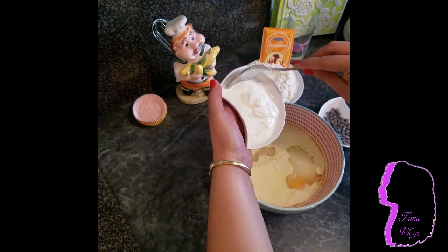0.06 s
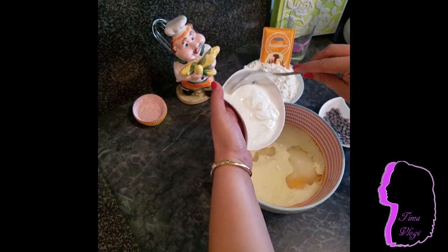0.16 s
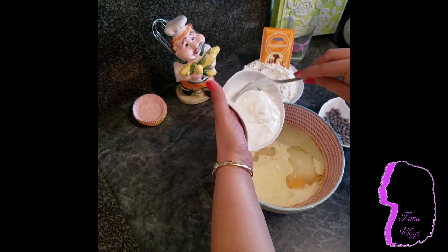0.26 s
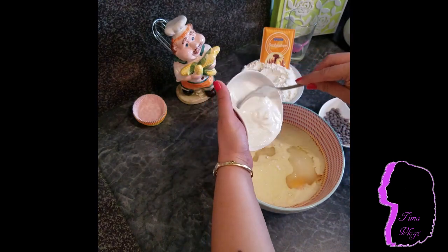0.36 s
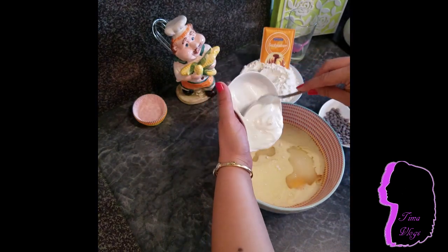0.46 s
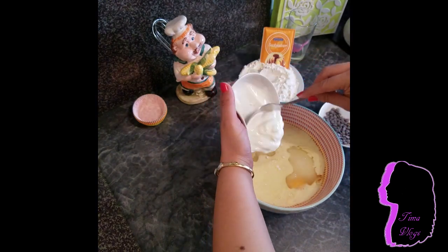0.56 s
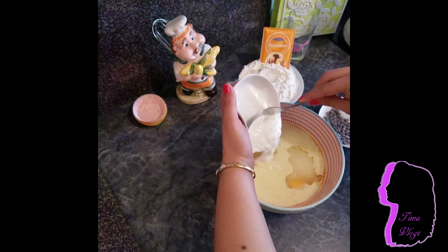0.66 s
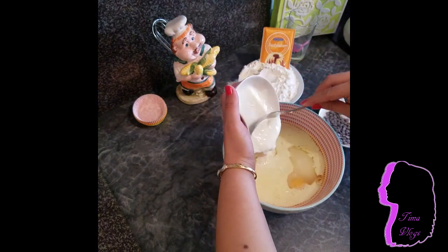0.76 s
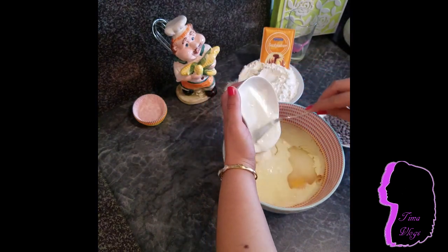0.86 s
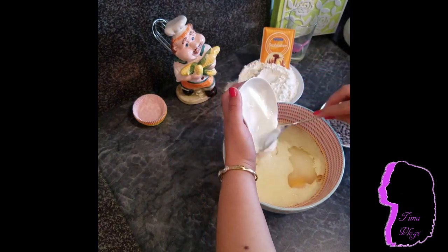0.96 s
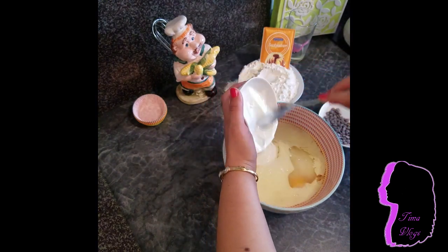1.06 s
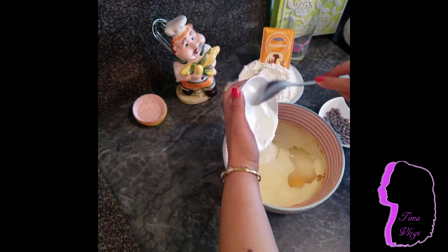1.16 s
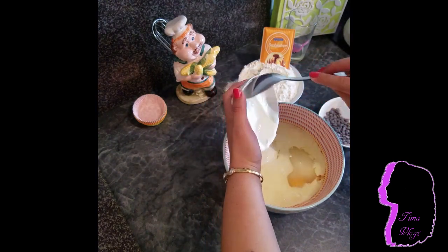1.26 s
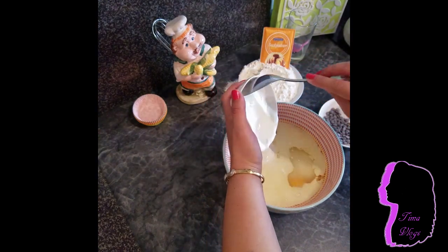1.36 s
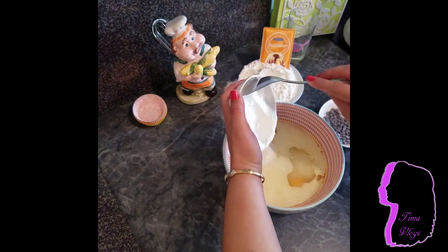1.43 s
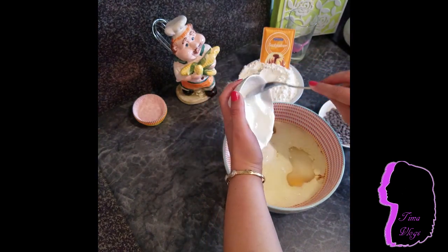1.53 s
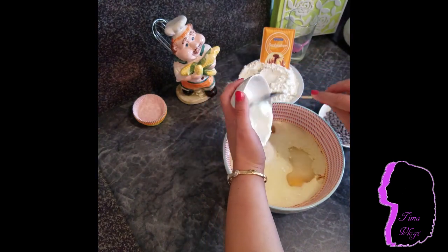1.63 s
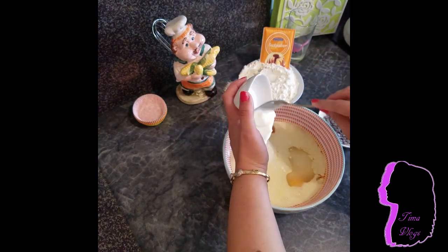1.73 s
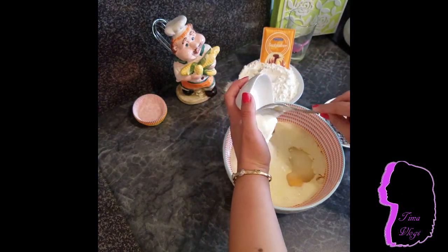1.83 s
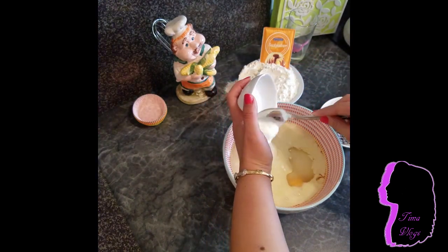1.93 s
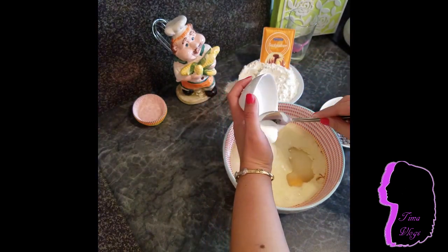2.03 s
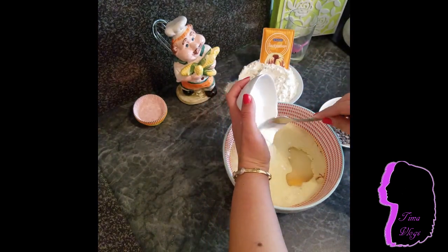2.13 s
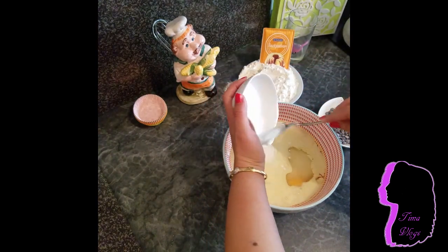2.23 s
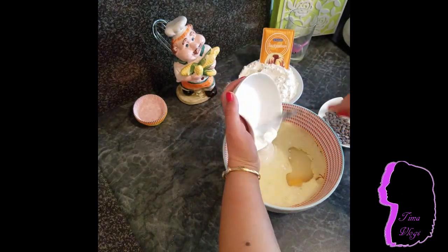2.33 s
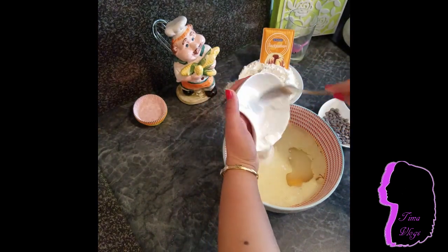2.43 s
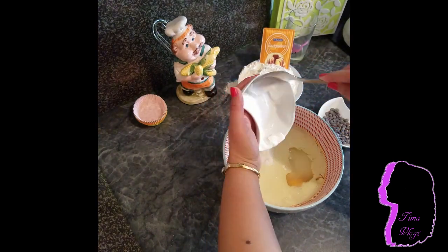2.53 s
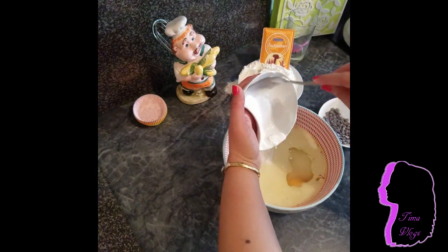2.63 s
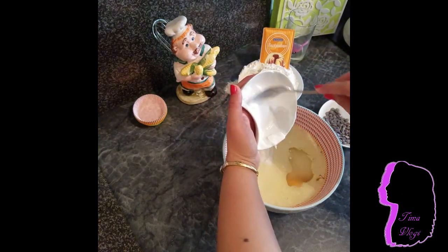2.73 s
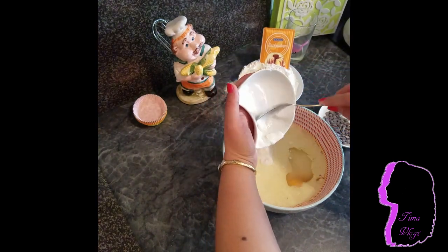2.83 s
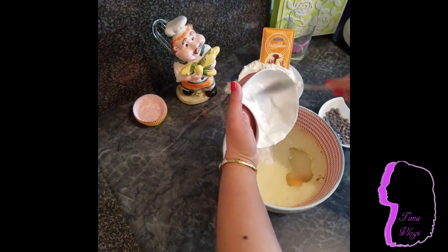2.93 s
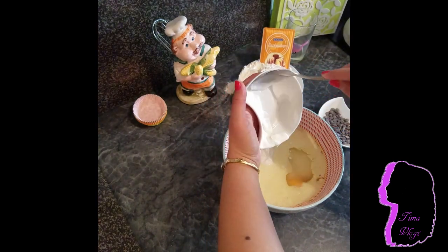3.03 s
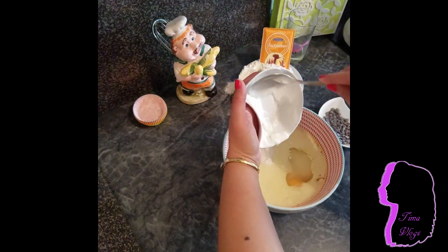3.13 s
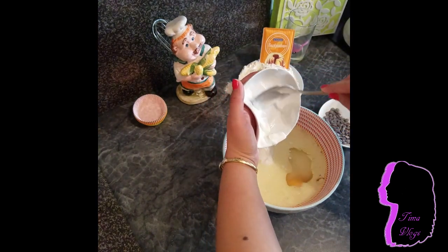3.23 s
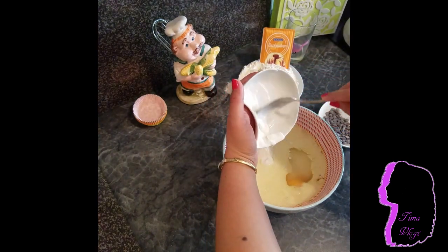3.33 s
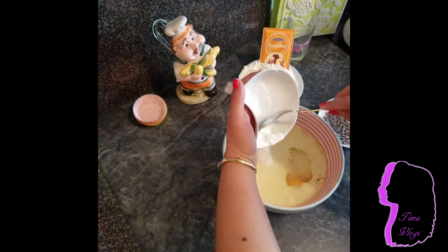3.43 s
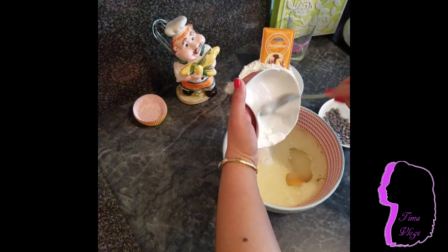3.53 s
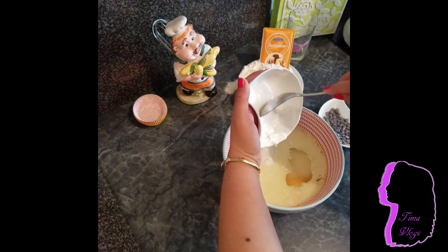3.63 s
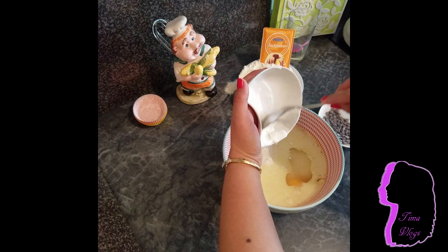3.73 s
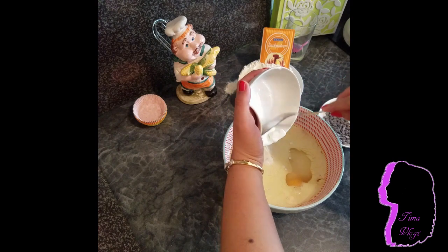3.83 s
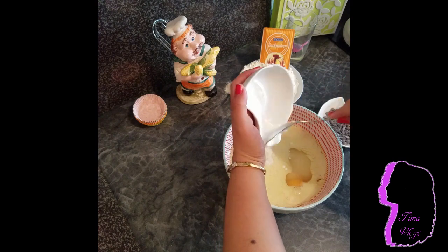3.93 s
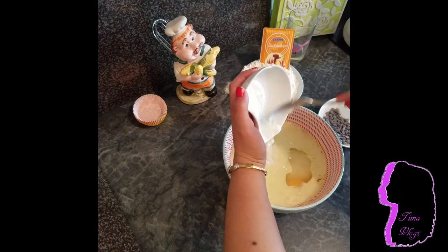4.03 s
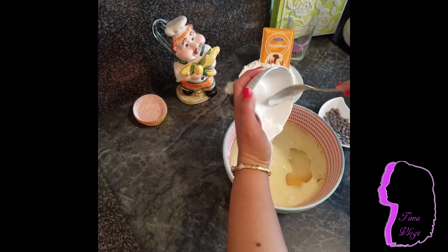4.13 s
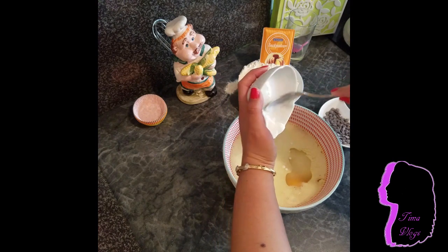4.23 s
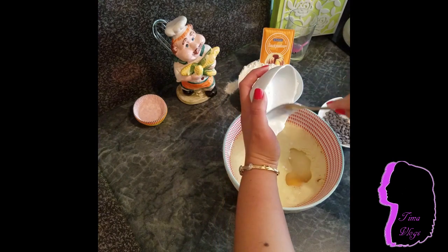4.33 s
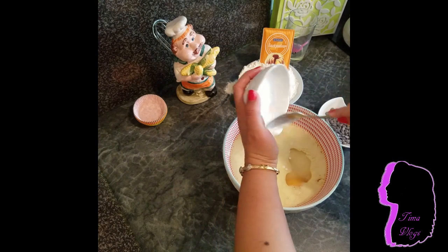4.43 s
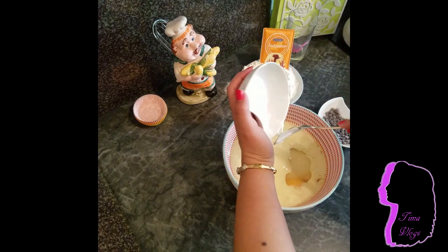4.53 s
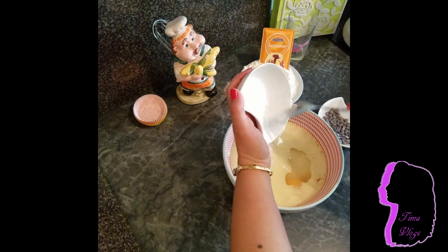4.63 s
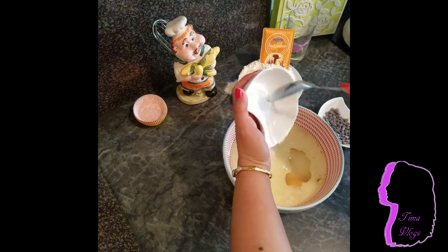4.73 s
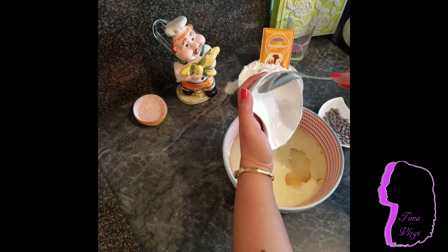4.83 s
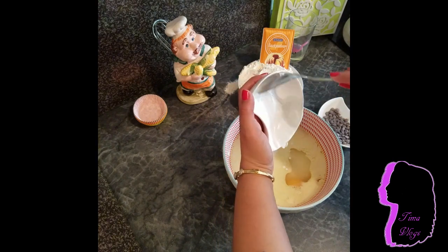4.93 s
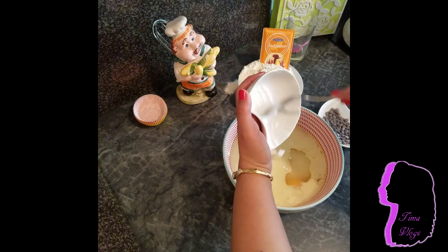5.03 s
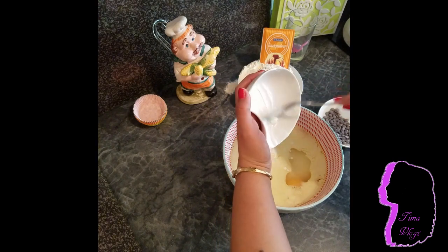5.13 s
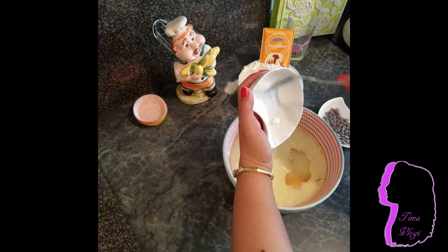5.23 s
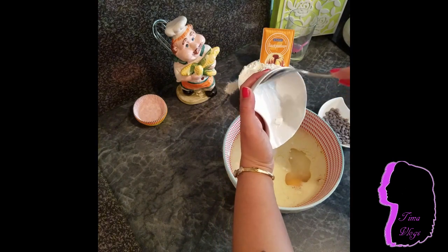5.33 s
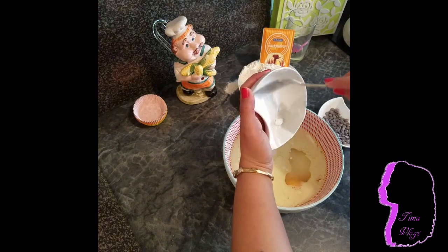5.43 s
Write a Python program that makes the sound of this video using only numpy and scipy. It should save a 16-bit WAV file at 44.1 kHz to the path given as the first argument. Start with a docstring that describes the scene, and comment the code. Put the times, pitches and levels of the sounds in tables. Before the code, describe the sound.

Close-up spoon and bowl sounds in a quiet home kitchen: a nearly silent opening with faint rubs, a crisp tap with small ticks and a scrape, then hard double knocks and single clinks until a final double tap at the end. Rings are short, damped by the gripping hand; reverberation is brief, with faint room air underneath.

```python
"""The fading ring of an earlier tap comes first, in a quiet kitchen: a steel spoon in a small hand-held bowl.
Taps and small slip-ticks crack, rattle, thud into the hand and ring the bowl's modes as each spot allows.
Between taps the spoon's edge sticks and slips along the glaze, squeaking through gliding and fixed resonances.
Hard counter and walls answer; filtered noise makes the uneven room air, a low hum and two microphones' hiss."""
import sys
import numpy as np
from scipy import signal
from scipy.fft import rfft, irfft, next_fast_len
from scipy.io import wavfile
from scipy.ndimage import map_coordinates

SR = 44100
rng = np.random.default_rng(int(sys.argv[2]) if len(sys.argv) > 2 else 0)


def wav_out(sig):
    """Save sig, one row per channel (or a flat mono array), as 16-bit PCM at SR to the path in sys.argv[1]."""
    wavfile.write(sys.argv[1], SR, np.round(np.clip(np.atleast_2d(sig).T, -1, 1) * 32767).astype(np.int16))


N = 241138  # length in samples


def amp(db):
    """Decibels to gain."""
    return 10 ** (np.asarray(db) / 20)


def unit(x):
    """Scaled to rms 1."""
    return x / np.sqrt(np.mean(np.abs(x) ** 2) + 1e-20)


def along(points, hz):
    """Interpolate (Hz, value) points on a log frequency axis."""
    point_hz, values = np.transpose(points)
    return np.interp(np.log(hz + 1), np.log(point_hz + 1), values)


def filtered(x, response):
    """x times a complex response of frequency, padded so that its end does not wrap round."""
    n = x.shape[-1]
    padded = next_fast_len(n + 8192)
    spectrum = rfft(x, padded) * response(np.fft.rfftfreq(padded, 1 / SR))
    return irfft(spectrum, padded)[..., :n]


def resonances(modes):
    """Causal response of (Hz, width Hz, dB) resonances, added with alternating sign."""
    def response(hz):
        total = 0
        for k, (centre, width, db) in enumerate(modes):
            peak = 1j * hz * width / (centre * centre - hz * hz + 1j * hz * width)
            total = total + (-1) ** k * amp(db) * peak
        return total
    return response


def wobble(rate):
    """A smooth random curve, rate knots a second."""
    knots = rng.standard_normal(int(N * rate / SR) + 4)
    return map_coordinates(knots, [np.arange(N) * rate / SR])


def add(track, s, x):
    """Mix x into track from time s, cut where the track ends."""
    part = track[:, round(s * SR):][:, :x.shape[1]]
    part += x[:, :part.shape[1]]


def kitchen(x, wet_db):
    """Direct sound, a little later on the left, plus a fresh diffuse tail for each microphone."""
    # How long the room rings. Each row: frequency in Hz, t60 in s.
    room_t60 = [(300, 0.19), (800, .27), (2100, 0.27), (5500, 0.26), (14600, 0.2)]
    n = SR // 3
    hz, t, cells = signal.stft(rng.standard_normal((2, n)), SR, nperseg=256)
    decay = amp(-60 * t / along(room_t60, hz)[:, None])
    tail = signal.istft(cells * decay, SR, nperseg=256)[1][:, :n]
    # counter and walls answer after a few milliseconds
    tail = tail * (1 - np.exp(-np.arange(n) / SR / 0.004))
    reply = amp(wet_db) * tail / np.linalg.norm(tail[0])
    reply[[0, 1], [3, 0]] += 1  # direct sound: left 3 samples late
    return signal.fftconvolve(x, reply, axes=1)


def ring(hz, db, lasting_db, t60, t):
    """A mode and its weaker split twin: a broad knock during contact, then a thinner, wandering ring."""
    pair_hz = hz * np.array([1, 1 + .006 * rng.standard_normal()])[:, None, None]
    # the fingers never hold quite still
    wander = np.cumsum(0.073 * rng.standard_normal((2, 1, len(t))), axis=2)
    # each microphone sees the rim from its own side
    phase = rng.uniform(0, 2 * np.pi, (2, 1, 1)) + rng.normal(0, hz / 3600, (2, 2, 1))
    twin_db = np.array([0, -9])[:, None, None]
    size = amp(db + twin_db + rng.normal(0, 1.2, (2, 2, 1)))
    modes = (size * np.sin(2 * np.pi * pair_hz * t + phase + wander)).sum(0)
    decay = amp(-60 * t / 0.044) + amp(lasting_db - 60 * t / t60)
    return modes * decay * (1 - np.exp(-t / 0.00098))


def bowl_ring(pitch, level, decays, lasting_db, tilt_db, t):
    """Bowl and spoon ring at their modes; upper modes follow the brightness of the contact."""
    # The sheen of upper modes. Each row: frequency in Hz, relative level in dB, t60 in s.
    sheen = [(5770, -4, .05), (7080, -7.5, 0.085), (8730, -4, 0.068), (9520, -9.5, .1), (11020, -8, 0.061),
             (11930, -5.5, 0.25), (12700, -6.5, .07), (13600, -9.5, .07), (15500, -7, .08)]
    # only the strongest rings outlast the grip
    lasting = lasting_db + .75 * (level - level.max())
    bowl = sum(ring(hz, db + 1, last, t60, t) for hz, db, last, t60 in zip(pitch, level, lasting, decays))
    for hz, db, t60 in sheen:
        upper_db = db - 14 + tilt_db(hz) + rng.normal(0, 2.6)
        bowl = bowl + ring(hz * rng.normal(1, 0.01286), upper_db, lasting_db - 16.5, t60, t)
    return bowl


def contact_noise(pitch, level, thud_db, tilt_db, t):
    """One burst of grit gives a crack, a rattle through the damped modes and a dull thud into the hand."""
    # Tone of the crack. Each row: frequency in Hz, relative density in dB per Hz.
    crack_tone = [(150, -21), (600, -8), (1500, -9), (3500, 2), (6500, -12), (8000, 0.5), (12500, -9),
                  (15500, -9)]
    grit = rng.standard_normal(len(t)) + .5 * rng.standard_normal((2, len(t)))
    crack = unit(filtered(grit, lambda hz: amp(along(crack_tone, hz) + tilt_db(hz))))
    crack = crack * (amp(-9.0 - 60 * t / 0.015) + amp(-21.5 - 60 * t / 0.15))  # sharp, then a faint trail
    damped_modes = [(hz, .07 * hz, db) for hz, db in zip(pitch, level)]
    rattle = filtered(grit, resonances(damped_modes)) * amp(13 - 60 * t / .07)
    thud = unit(filtered(grit, resonances([(330, 100, 30), (780, 400, 4.7)])))
    thud = thud * amp(thud_db + 5.5 - 60 * t / 0.04) * (1 - np.exp(-t / 0.0066))
    return (crack + rattle) * (1 - np.exp(-t / .001)) + thud


def handle(hz, db):
    """The free end of the spoon sings on faintly, one sine with drifting phase."""
    t = np.arange(SR // 3) / SR
    drift = np.cumsum(0.016 * rng.standard_normal(len(t)))
    phase = rng.uniform(0, 2 * np.pi, (2, 1))
    return amp(db - 60 * t / .5) * np.sin(2 * np.pi * hz * t + drift + phase)


def taps_and_ticks():
    """Each contact excites the modes according to its spot; grip and load shift and damp or free them."""
    # The fading first ring, the taps and the small slip-ticks of the scraping spoon. Each row: start in s,
    # spot, relative level in dB, relative thud in dB, relative brightness in dB, left-right difference
    # in dB, relative lasting part of the ring in dB, pitch shift in %,
    # pitch in Hz around which the grip frees or damps the rings, and by how many dB.
    contacts = [(0.0, "wall", -46, -23, -14, 0, -12, 0.32, 2383, 16),
                (0.358, "curve", -36.5, -19, -20.5, -1, -30, -1, 1019, 13),
                (0.765, "curve", -59.5, 0, -31, -3, -19, -0.37, 2600, 6),
                (1.275, "wall", -18.5, -21, -14, -0.5, -4.5, -0.24, 4440, 9.5),
                (1.406, "wall", -36, -56, -11.5, 2.5, -20, -0.49, 4420, 16.5),
                (1.518, "edge", -30.5, -24.5, -22.5, -0.5, -2.5, 0.65, 4060, 3.5),
                (1.662, "edge", -53.5, -33, -41, -2.5, 5, -0.4, 3030, 8),
                (1.68, "edge", -45.5, -17, -20, -2.5, 1, -2.4, 2376, 16.5),
                (1.801, "edge", -47.5, -13, -54, -2.5, -2, 0.26, 1570, 17),
                (1.838, "edge", -65, -15, -33, 9, -14, -1.2, 1460, 13),
                (1.929, "curve", -27.5, -30, -34, -1, -16.5, -0.091, 3287, 9),
                (2.186, "curve", -55, -26, -38, -3, -1.5, 0.13, 1634, 22),
                (2.573, "rim", -13.5, -60, -12, -1, -6.5, -0.9, 3200, 8),
                (2.634, "lip", -14, -36, -15.5, 0.5, -13, -0.24, 2860, 3),
                (2.85, "floor", -29, -21, -22.5, -0.5, -11, -0.58, 6300, -6),
                (3.064, "rim", -21.5, -54, -12, 1, 1.5, 1.08, 5150, -5),
                (3.105, "lip", -15.5, -42, -16.5, -1, -9.5, .8, 4840, 3.5),
                (3.38, "floor", -26, -23.5, -21.5, -1, -4, -0.49, 3300, -4),
                (3.621, "foot", -16, -29.5, -19.5, 1, -29, 0.86, 5400, 3.5),
                (3.662, "foot", -14, -37, -18, -0.5, -31, -1, 6870, 7),
                (4.171, "wall", -16, -23.5, -20, 0, -14.5, 1.08, 6150, -19),
                (4.254, "curve", -40.5, -14, -41, -2.5, -14, -1.8, 1000, 30),
                (4.382, "curve", -24.5, -48, -26.5, -1, -27, 1.9, 2940, 9.5),
                (4.517, "side", -40.5, -33, -25, -1, -26, 0.56, 2600, 21),
                (4.525, "side", -39, -37.5, -14, -0.5, -31, 0.23, 1475, 18.5),
                (4.907, "side", -33, -23, -14.5, -0.5, -25, 0.44, 5280, -9),
                (5.355, "rim", -15.5, -45, -10.5, -1.5, -23, 1.7, 6540, -8.5),
                (5.379, "lip", -14, -33.5, -19, 0.5, -11.5, .8, 5250, 11)]
    # Modes of bowl and spoon. Each row: frequency in Hz, t60 of the lasting part in s,
    # then relative level in dB when excited at each of the spots.
    rings = [(1054, 0.076, -28.5, -29.5, -30, -19, -38, -13, -20.5, -25.5),
             (1206, 0.058, -42.5, -32, -32, -38, -16.5, -43, -26.5, -26),
             (1473, 0.21, -12, -36.5, -47, -33, -19.5, -27, -16, -50),
             (1600, .17, -44, -30.5, -29.5, -44.5, -23, -45, -22.5, -24),
             (1732, 0.061, -33, -43, -23.5, -19.5, -25, -42, -12.5, -28),
             (2430, 0.084, -21.5, -35.5, -33, -38, -27.5, -17, -46, -16.5),
             (2428.5, .13, -28, -12.5, -20.5, -34, -27, -19, -45, -26),
             (2575, 0.047, -43, -35.5, -34, -17, -42, -23, -11.5, -19),
             (2892, 0.12, -52, -41, -19.5, -61, -30, -16.5, -13, -23),
             (3059, .055, -26.5, -20.5, -41.5, -32, -6.5, -17, -13.5, -60),
             (3331, .055, -27.5, -31.5, -48, -18.5, -17, -46, -14, -27.5),
             (3743, 0.05, -15, -22.5, -15.5, -43, -23, -18, -17.5, -50),
             (3933, 0.04, -36, -26.5, -14.5, -40, -10, -12, -41, -30),
             (4480, 0.08, -21.5, -19, -26, -35, -15, -19, -17, -15.5),
             (4634, 0.19, -39, -36, -31, -11, -22, -35, -24, -40),
             (5006, 0.15, -24, -20, -17, -22.5, -17, -7, -14.5, -13.5),
             (5210, 0.53, -37.5, -20, -29.5, -35, -38, -2.5, -48, -22.5),
             (6220, 0.069, -7.5, -26, -29.5, -14.5, -18.5, -15, -27, -31),
             (6606, 0.049, -13.5, -8.5, -16, -45, -33, -10, -22, -20)]
    # Where the spoon meets the bowl: names, in the order of the level columns above.
    spots = ("wall", "rim", "lip", "floor", "edge", "side", "curve", "foot")
    grip_width = 0.036  # reach of the grip, in natural log of the pitch ratio
    handle_ring = 15  # row, from 0, of the ring that the handle carries on
    out, t = np.zeros((2, N)), np.arange(SR // 6) / SR
    fade = np.clip((t[-1] - t) / .03, 0, 1)
    rest_hz, decays, *spot_levels = np.transpose(rings)
    for s, spot, db, thud_db, bright_db, pan_db, lasting_db, shift, grip_hz, grip_db in contacts:
        pitch = rest_hz * (1 + shift / 100)
        grip = np.exp(-(np.log(pitch / grip_hz) / grip_width) ** 2)
        level = spot_levels[spots.index(spot)] + grip_db * grip
        # each contact has its own brightness, felt most in the upper treble
        tilt_db = lambda hz: along([(5000, 0.41), (9000, 1)], hz) * (bright_db + 18.5)
        bowl = bowl_ring(pitch, level, decays, lasting_db, tilt_db, t)
        noise = contact_noise(pitch, level, thud_db, tilt_db, t)
        place = amp(db) * amp([[pan_db / 2], [-pan_db / 2]])
        add(out, s, kitchen(place * (bowl + noise) * fade, wet_db=-8.0))
        add(out, s, place * handle(pitch[handle_ring], level[handle_ring] + lasting_db - 5))
    # a small bowl radiates no bass
    return filtered(out, lambda hz: (1j * hz / (120 + 1j * hz)) ** 2)


def rush(spectrum):
    """Stereo noise of rms 1, its left-right likeness set by mixing mid and side at each frequency."""
    # Each row: frequency in Hz, likeness of the two microphones (1 the same, 0 unrelated).
    alike = [(30, 0.66), (70, 1), (130, 0.47), (300, 0.63), (640, 0), (15000, 0.032)]

    def mid_side(hz):
        turn = np.arccos(np.clip(along(alike, hz), -1, 1)) / 2
        return amp(along(spectrum, hz)) * [np.cos(turn), np.sin(turn)]
    mid, side = filtered(rng.standard_normal((2, N)), mid_side)
    return unit(np.array([mid + side, mid - side]))


def room_floor():
    """Soft room air and lingering reverberation, uneven in level, a low hum and hiss, all shaped noise."""
    # Uneven level of air and lingering reverberation. Each row: time in s, relative level in dB.
    unevenness = [(0.0, -70), (0.61, -64.5), (0.8, -68), (2.0, -67.5), (2.9, -69.5), (3.7, -65.5),
                  (3.95, -67.5), (4.22, -67.5), (4.5, -67.5), (5.47, -67)]
    # Tone of the room air. Each row: frequency in Hz, relative density in dB per Hz.
    air_tone = [(88, -46), (150, -6), (369, -3.5), (725, -12.5), (825, -8.5), (908, -11), (2100, -13.5),
                (2310, -13.5), (7000, -30.5), (9100, -73), (15400, -120)]
    # Tone of the low hum. Each row: frequency in Hz, relative density in dB per Hz.
    hum_tone = [(15, -30), (24, -6), (32, -17), (50, -6), (62, -9), (80, -4.5), (100, -3), (118, 2),
                (146, -9), (250, -7), (320, -36), (550, -120)]
    # Tone of the microphone hiss. Each row: frequency in Hz, relative density in dB per Hz.
    hiss_tone = [(2350, -31.5), (4000, -21.5), (5690, -11.5), (6570, -5), (8330, -0.5), (9190, -4),
                 (13700, 3), (15900, 4)]
    s, db = np.transpose(unevenness)
    air = amp(np.interp(np.arange(N) / SR, s, db) + 0.11 * wobble(6)) * rush(air_tone)
    hum = amp(-74.5 + 1.2 * wobble(1)) * rush(hum_tone)
    hiss = amp(-73.5) * rush(hiss_tone)
    return air + hum + hiss


def gliding_squeak(force, hz, width_hz):
    """Grainy force through a resonance that follows hz: shifted down, low-passed and shifted back up."""
    skirt = 0.045  # share of broad rubbing around the squeak
    turn = 2 * np.pi * np.cumsum(hz) / SR
    narrow = lambda f: 1 / (1 + 1j * f / width_hz) ** 2 + skirt / (1 + 1j * f / 400)
    return unit(sum(filtered(force * wave(turn), narrow) * wave(turn) for wave in (np.cos, np.sin)))


def strokes():
    """The spoon's edge sticks and slips over the glaze: grainy force into a gliding squeak and fixed modes."""
    # The strokes. Each row: (body, rasp and fizz in dB relative to the loudest squeak, half width of the
    # squeak in Hz), then the drag as points of time in s, relative squeak level in dB, squeak pitch in Hz.
    drags = [((-7, -7.5, -14, 88), [(.17, -90, 2810), (.228, -68, 2730), (.27, -82, 2620),
             (.32, -69.5, 2760), (.35, -72, 2700)]), ((-1.5, -1, -17, 250), [(.4, -101, 2740),
             (.468, -69.5, 2960), (.56, -80, 2770)]), ((-11, -8, -31, 100), [(.9, -93, 1730),
             (.97, -74, 1800), (.996, -62.5, 1580), (1.052, -98, 1630), (1.08, -90, 1650)]),
             ((-12.5, -13, -19, 100), [(1.535, -57, 3140), (1.567, -60, 2990), (1.592, -57, 2760),
             (1.625, -54.5, 2840), (1.66, -49.5, 2990), (1.725, -56.5, 3180), (1.76, -61.5, 3030),
             (1.833, -64, 3100), (1.89, -99, 3200)]), ((-3.5, -7, -13, 300), [(2.12, -76, 2430),
             (2.158, -69, 2380), (2.194, -64.5, 1970), (2.24, -106, 2110)]), ((-1.5, -4, -10, 110),
             [(2.72, -85, 1700), (2.742, -68, 1710), (2.806, -64, 1770), (2.818, -66, 1720),
             (2.84, -54.5, 1680)]), ((-12, -10.5, -11, 139), [(3.7, -52, 2580), (3.715, -67, 2850),
             (3.764, -49.5, 2660), (3.79, -54, 2760), (3.85, -101, 2500)]), ((-8.5, -11.5, -21, 265),
             [(3.86, -91, 2340), (3.89, -58.5, 2434), (3.92, -55.5, 2220), (3.972, -63, 2170),
             (3.995, -88, 2340)]), ((-16, -14, -19, 80), [(4.24, -65, 2600), (4.258, -56, 2520),
             (4.272, -67, 2680), (4.304, -54.5, 2820), (4.372, -66.5, 2750)]), ((9.5, 7, -2, 150),
             [(4.42, -75, 2900), (4.456, -84, 2730), (4.47, -72, 2640), (4.51, -68, 2640)]),
             ((-12, -7, -9, 98), [(4.93, -88, 2900), (5.0, -59.5, 2740), (5.024, -53, 2860),
             (5.102, -51.5, 2836), (5.135, -96, 2810), (5.17, -93, 2830)])]
    # Low fixed modes under the rub. Each row: frequency in Hz, width in Hz, relative level in dB.
    body_modes = [(1030, 115, 0), (1187, 69, 4), (1584, 75, 4), (1863, 81, 6.5), (1970, 90, -7),
                  (3230, 240, -5)]
    # Middle fixed modes, the rasp. Each row: frequency in Hz, width in Hz, relative level in dB.
    rasp_modes = [(3960, 70, 3), (4410, 59, 1), (4790, 120, 2), (5420, 420, -0.5), (6120, 120, 3),
                  (6570, 850, -6.5)]
    # High fixed modes, the fizz. Each row: frequency in Hz, width in Hz, relative level in dB.
    fizz_modes = [(10150, 250, 0), (11200, 250, -8), (13150, 350, -2)]
    rub_follows = .6  # the fixed modes swing less widely than the squeak, dB per dB
    out = np.zeros((2, N))
    force = rng.standard_normal((2, N)) * amp(1.9 * wobble(170) + .5 * wobble(30))
    force = unit(force[0] + 0.98 * force * [[0], [1]])  # the right adds grain of its own
    body = unit(filtered(force, resonances(body_modes)))
    rasp = unit(filtered(force, lambda f: resonances(rasp_modes)(f) + 0.066 * (f > 3400) * (f < 8000)))
    fizz = unit(filtered(force, lambda f: resonances(fizz_modes)(f) + .1 * (f > 7000)))
    for (body_db, rasp_db, fizz_db, width_hz), drag in drags:
        s, db, hz = np.transpose(drag)
        cut = slice(round(s[0] * SR), round(s[-1] * SR))
        t = np.arange(N)[cut] / SR
        level_db = np.interp(t, s, db)
        squeak = gliding_squeak(force[:, cut], np.interp(t, s, hz), width_hz)
        modes = amp(body_db) * body[:, cut] + amp(rasp_db) * rasp[:, cut] + amp(fizz_db) * fizz[:, cut]
        modes = modes * amp((rub_follows - 1) * (level_db - db.max()))
        fade = np.clip(np.minimum(t - s[0], s[-1] - t) / 0.0082, 0, 1)
        add(out, s[0], kitchen((squeak + modes) * fade * amp(level_db - 1), wet_db=-7))
    return out


def scene():
    """All sources at the microphones."""
    return taps_and_ticks() + room_floor() + strokes()


def record(dry):
    """The microphones lean apart, the top treble falls away steeply and a band limit ends it."""
    # Response of both microphones. Each row: frequency in Hz, gain in dB.
    mic = [(20, 0), (15700, 0), (16000, -22), (17000, -28)]
    # How the two microphones differ. Each row: frequency in Hz, left-right difference in dB.
    lean = [(100, -0.5), (300, -4.5), (700, -1.5), (3000, -0.5), (5500, 2.5), (9000, -4.5), (14000, 0)]
    top_hz = 17000

    def response(hz):
        gain_db = along(mic, hz) + along(lean, hz) * [[.5], [-.5]]
        return amp(gain_db) * (hz < top_hz)
    return filtered(dry, response)


dry = scene()
out = record(dry)
wav_out(out)
```